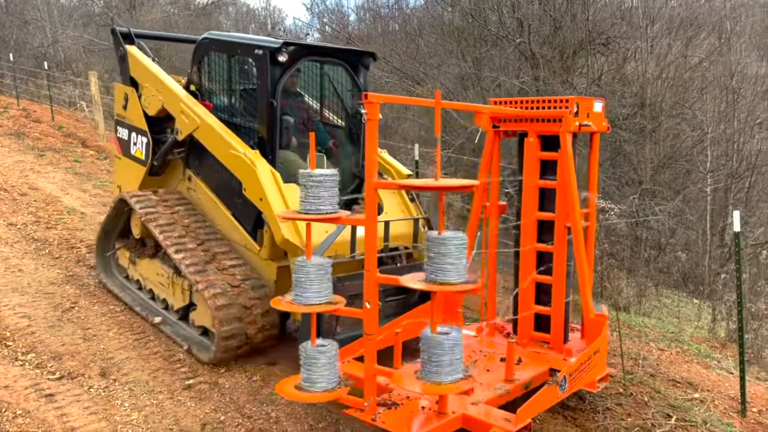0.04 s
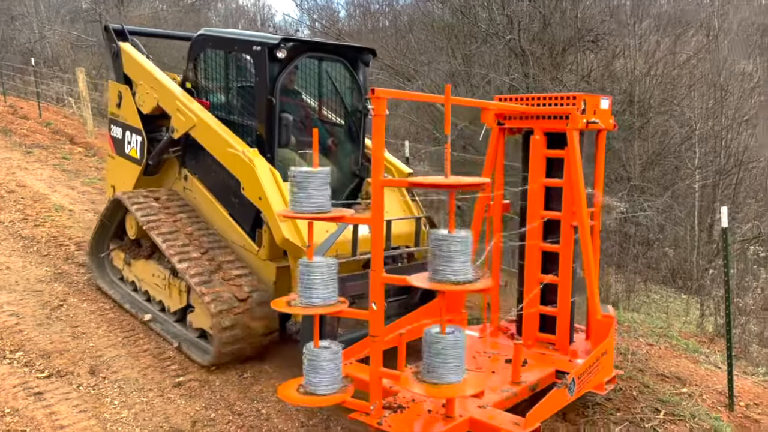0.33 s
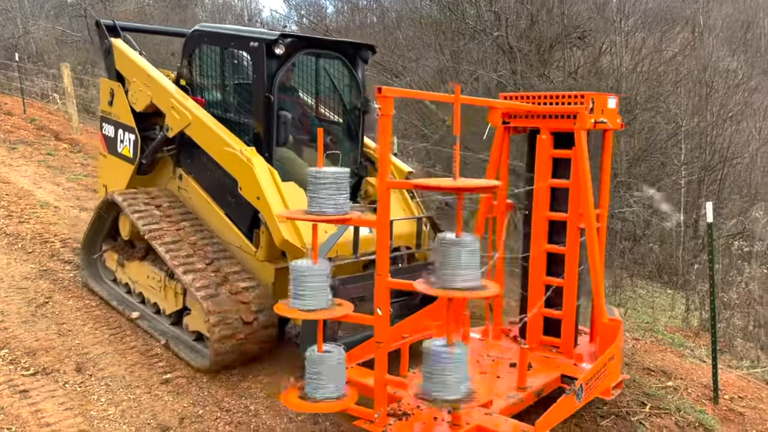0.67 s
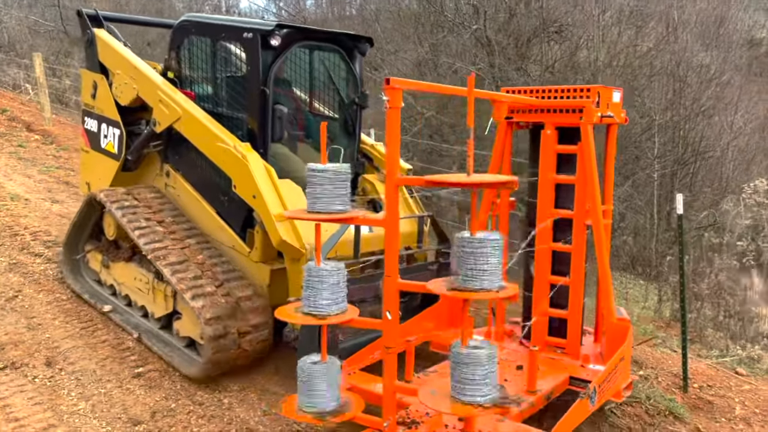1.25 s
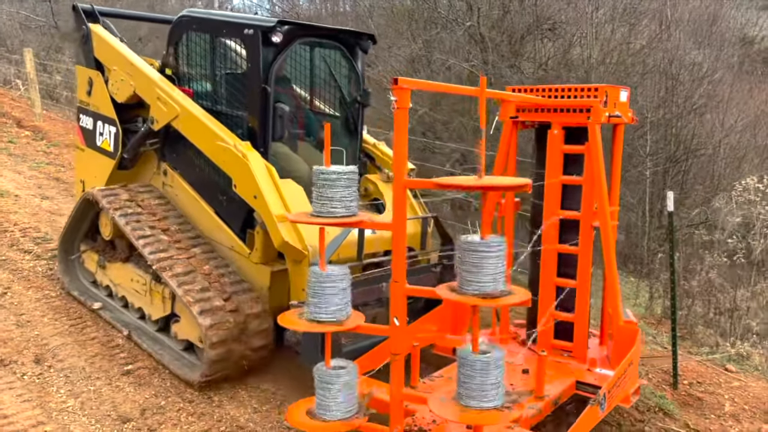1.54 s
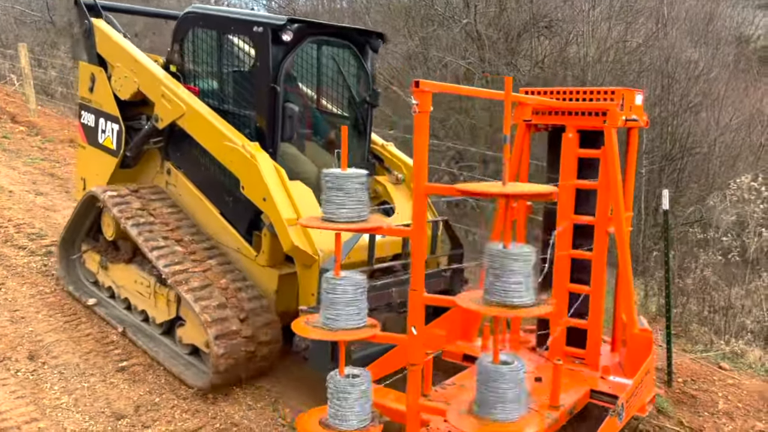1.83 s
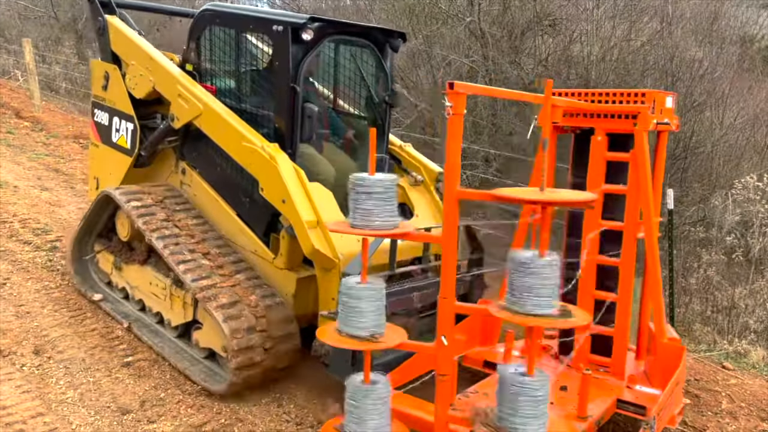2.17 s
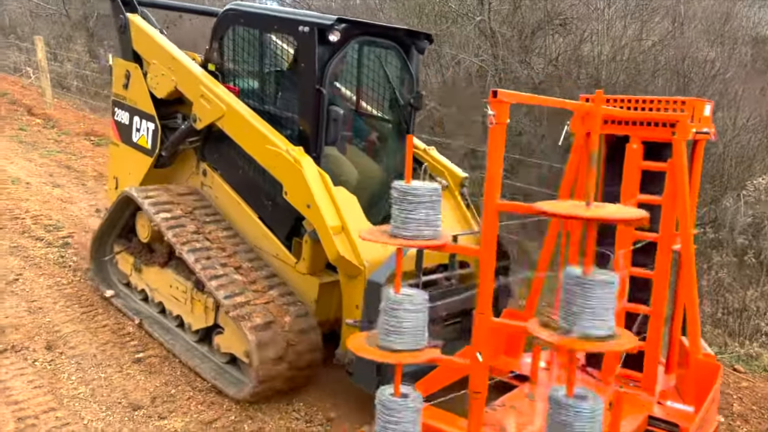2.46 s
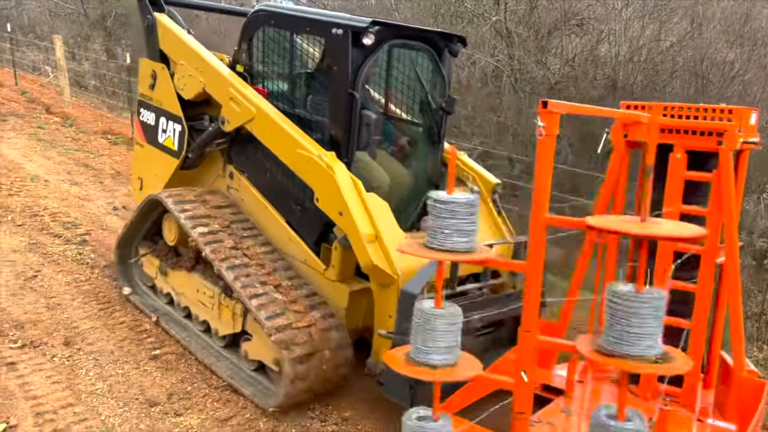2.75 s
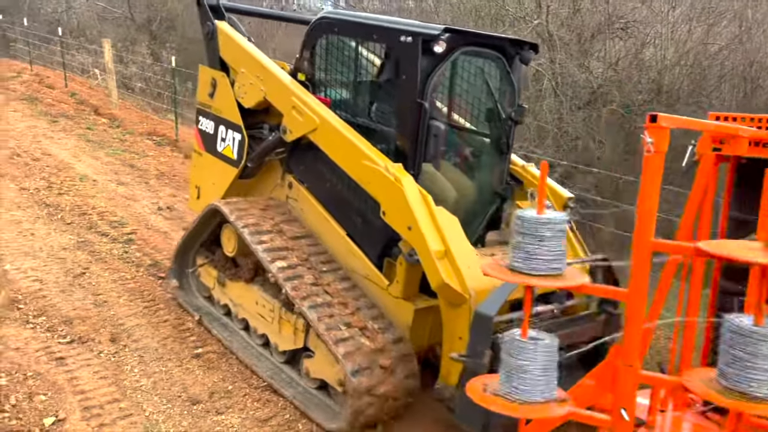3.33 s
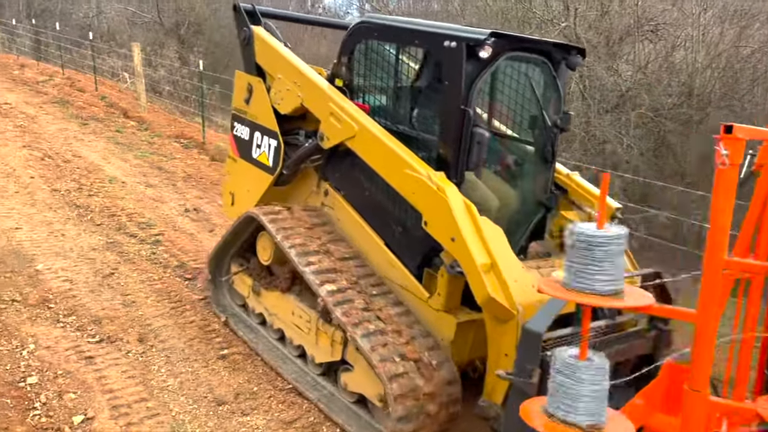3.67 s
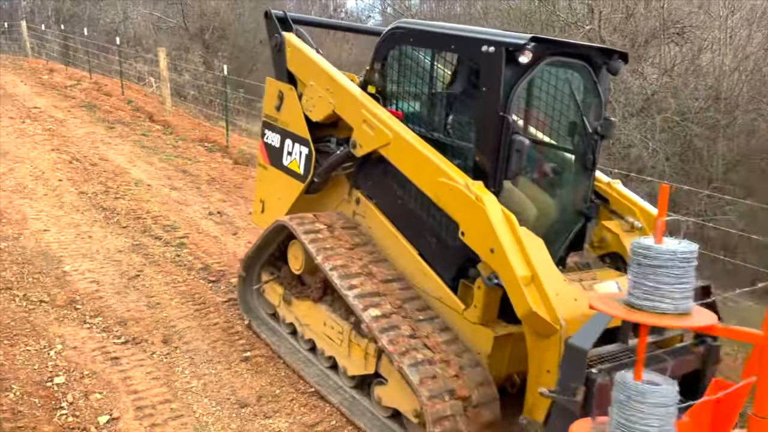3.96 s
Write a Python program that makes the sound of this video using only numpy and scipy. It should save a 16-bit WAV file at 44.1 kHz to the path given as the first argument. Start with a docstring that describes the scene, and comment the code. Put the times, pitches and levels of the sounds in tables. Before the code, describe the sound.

A tracked loader crawls along outdoors, its diesel droning and hydraulics whining over rumbling, gritty tracks. Its steel rack and wire spools clank and jingle throughout. Wind buffets the close microphone early; brief scrapes and squeals come later.

```python
"""A dirt slope: a compact tracked loader crawls along, carrying a steel rack of fence-wire spools.
The diesel drones and the hydraulic drive whines over tracks that rumble and crush grit. Spools chink
on their spindles, wire jingles and pings, and the rack clanks, scrapes and squeals in its mount.
A gust buffets the microphone in the first second or so; soft low thumps come during and after it."""
import sys
import numpy as np
from scipy import signal
from scipy.fft import rfft, irfft
from scipy.io import wavfile
from scipy.ndimage import uniform_filter1d

SR = 44100
rng = np.random.default_rng(int(sys.argv[2]) if len(sys.argv) > 2 else 0)


def master_out(mix):
    """Clip the mix to full scale and print it as 16-bit PCM to the path in sys.argv[1]."""
    frames = np.transpose(np.atleast_2d(mix))
    ceiling = np.clip(frames, -1, 1)
    pcm = np.round(ceiling * 32767).astype(np.int16)
    wavfile.write(sys.argv[1], SR, pcm)


N = 176400

# Engine speed. Each row: time in seconds, firings per second.
FIRING_HZ = [(0, 76.8), (.5, 75.8), (1, 75.5), (2, 76), (2.8, 76.8), (3.3, 76.4), (4, 75.6)]
# Exhaust partials. Each row: multiple of the crank rate, relative level in dB.
EXHAUST_ORDERS = [(1, -13.5), (2, -0.5), (3, -12.5), (4, -21), (5, -27), (6, -20.5), (8, -23)]
# Exhaust drone and high engine whine. Each row: time in seconds, gain in dB.
EXHAUST_DB = [(0, -24.5), (.3, -28), (.7, -23.5), (1.05, -37.5), (1.6, -40), (2.2, -41), (2.6, -36),
              (3, -25.5), (3.3, -26), (3.5, -32.5), (3.75, -26.5), (4, -22)]
HIGH_WHINE_DB = [(0, -59), (1.8, -46), (3.3, -47.5), (3.7, -41), (4, -41)]
# Pump and drive motor whines. Each row: harmonic number, level in dB.
PUMP_PARTIALS = [(2, -47.5), (3, -40.5), (4, -40.5), (5, -55), (6, -51.5)]
MOTOR_PARTIALS = [(1, -42), (2, -45.5), (3, -43), (4, -39.5), (5, -50.5)]
# Their envelopes. Each row: time in seconds, gain in dB.
PUMP_GAIN_DB = [(0, -0.5), (1, 1), (1.7, 3), (2.3, -3), (3, -9.5), (4, -2)]
MOTOR_GAIN_DB = [(0, -6), (.6, -5), (1.5, -5.5), (2.3, -6), (3, -0.5), (4, 4.5)]

# Track rumble, grit, loose wire and gust. Each row: frequency in Hz, relative density in dB.
RUMBLE_SPECTRUM = [(20, -28), (35, -7), (55, 8.5), (90, 6.5), (150, -1), (260, -1.5), (340, 2), (410, -3.5),
                   (490, -1.5), (670, 0.5), (800, -4), (930, -8.5), (1060, -12.5), (1300, -10.5),
                   (1800, -17.5), (3000, -57.5), (8000, -75)]
GRIT_SPECTRUM = [(300, -36), (1000, 11), (2000, 5), (3200, 6.5), (3900, 5), (4600, 2.5), (6000, 0.5),
                 (7200, -5), (9000, -8), (12500, -5), (16000, -26)]
JINGLE_SPECTRUM = [(500, -30), (1500, 3.5), (2400, 6.5), (3200, 0), (4000, -3), (5500, 7), (7000, -1.5),
                   (9000, 1), (12500, -2.5), (16000, -42)]
GUST_SPECTRUM = [(20, -35), (36, -12), (52, -2), (100, -1.5), (150, -5), (260, -8.5), (400, -21),
                 (800, -27), (3000, -55)]
# Their envelopes. Each row: time in seconds, level in dB.
RUMBLE_DB = [(0, -29), (.8, -30), (1.3, -30), (1.7, -29), (2.1, -30.5), (2.4, -28), (2.8, -29.5),
             (3.4, -28.5), (4, -27.5)]
GRIT_DB = [(0, -43), (.8, -34.5), (1.3, -43), (1.7, -42), (2.05, -38), (2.4, -34.5), (2.8, -37),
           (3.15, -38.5), (3.5, -38.5), (4, -32)]
JINGLE_DB = [(0, -41), (.2, -30), (.35, -44), (.55, -33), (.7, -37.5), (.78, -34), (1.05, -44), (1.6, -41),
             (1.9, -40), (2.1, -35), (2.4, -42), (2.8, -42.5), (3.05, -37.5), (3.45, -42.5), (3.9, -38)]
GUST_DB = [(0, -61), (.33, -31), (.45, -24.5), (.57, -28), (.66, -22), (.8, -19.5), (.87, -25),
           (.94, -20.5), (1.08, -28.5), (1.4, -49), (2.1, -60), (4, -62)]

# Steel modes. Each row: frequency in Hz, relative level in dB, T60 in seconds.
SPOOL_MODES = [(1024, 1, 0.24), (1754, 5.5, 0.25), (1880, -7, 0.29), (2335, 0, 0.48), (3115, 7, 0.29),
               (3134, 6.5, 0.69), (3354, 4.5, 0.35), (4550, 5, 0.13), (5340, 7, 0.24), (5440, 9, 0.12),
               (6080, 6, 0.059), (6600, 6, 0.078)]
RACK_MODES = [(873, -3, 0.36), (993, -6, 0.38), (1260, -4.5, 0.31), (1540, -4, 0.29), (2032, -0.5, 0.076),
              (2362, 5.5, 0.17), (2810, -2.5, 0.29), (3320, -9, 0.2), (3760, 1, 0.16), (4360, 5, 0.13),
              (5330, 6.5, 0.086)]
# Dense steel ringing and scrape rasp. Each row: frequency in Hz, relative density in dB.
SPOOL_WASH_SPECTRUM = [(300, -32), (900, 0), (2000, -5), (3200, -5.5), (4000, -3.5), (5400, 6), (7000, 3.5),
                       (9000, -1.5), (12500, -6), (16000, -28)]
RACK_WASH_SPECTRUM = [(200, 0), (800, -19.5), (2700, 16), (4200, 4.5), (6000, -2), (7500, -8),
                      (12500, -10.5), (16000, -43)]
RASP_SPECTRUM = [(150, -22), (480, 7.5), (850, -1), (1280, 3.5), (1750, -7.5), (2400, 2), (4000, -17),
                 (7000, -10), (16000, -81)]
# Blows on steel. Each row: start in seconds, low, mid and high band levels in dB, T60 factor.
SPOOL_BLOWS = [(.059, -34, -39, -41, 0.61), (.111, -31.5, -31.5, -28.5, 1.1), (.245, -45, -35.5, -30, 0.93),
               (.497, -29, -29.5, -27.5, 0.57), (.551, -34, -28.5, -18, 0.73), (.952, -39, -48, -33, 0.58),
               (1.118, -39, -32, -29, 0.79), (1.308, -32, -31.5, -27.5, 0.8),
               (1.539, -35.5, -38, -37, 0.63), (1.72, -49, -32, -31.5, 0.52), (1.865, -36, -32, -30.5, 0.9),
               (2.053, -38, -35.5, -35.5, 0.92), (2.08, -46, -50, -30.5, 1.3), (2.177, -43, -25, -20, 0.93),
               (2.256, -56, -39, -31.5, 1.1), (2.442, -29.5, -24, -22, 1.03),
               (2.603, -47, -30.5, -23, 0.88), (2.863, -41, -28, -29.5, 1.2), (3.23, -56, -30, -31, 0.75),
               (3.329, -58, -32.5, -24.5, 0.84), (3.563, -54, -25, -29, 0.56),
               (3.685, -39, -26, -26.5, 0.97), (3.858, -32.5, -28.5, -25.5, 0.21)]
RACK_BLOWS = [(.168, -28, -26.5, -45, 1.1), (.203, -30.5, -22, -37, 0.72), (.383, -30, -24.5, -29.5, 1.34),
              (.722, -23.5, -19, -27.5, 0.69), (.834, -37, -30, -35, 0.6), (.966, -24.5, -22, -27, 0.75),
              (1.193, -31.5, -29, -35, 0.82), (1.632, -48, -56, -57, 0.4), (1.958, -55, -31, -44, 1.2),
              (2.385, -43, -28, -32.5, 1.1), (3.594, -49, -32.5, -28.5, 1.7),
              (3.809, -52, -33.5, -41, 0.79), (3.899, -45, -28, -30, 0.51), (3.912, -28.5, -27, -58, 1.8)]
# Edges in Hz of the low-to-mid and mid-to-high band crossfades.
CROSSOVER_HZ = [1100, 1700, 3900, 4600]
# Plucked wire. Each row: start in seconds, frequency in Hz, level in dB, T60 in seconds.
WIRE_PINGS = [(.11, 1866, -22, 0.46), (.205, 1712, -21.5, .15), (.834, 4030, -18.5, 0.066),
              (.835, 4630, -10, 0.033), (2.18, 1800, -27.5, 0.43), (2.71, 3320, -25.5, 0.26),
              (3.018, 3930, -25.5, 0.27), (3.329, 3970, -21, 0.09), (3.684, 3140, -30, 0.15),
              (3.858, 2395, -14.5, 0.064)]
# Low thumps. Each row: centre in seconds, frequency in Hz, level in dB, time constant in seconds.
LOW_THUMPS = [(.452, 142, -12.5, 0.011), (0.608, 103, -10, .009), (.685, 117, -12, 0.012),
              (0.754, 62, -17, 0.012), (0.778, 425, -10.5, 0.0027), (0.804, 86, -1.5, 0.0057),
              (.828, 156, -11.5, 0.0062), (0.872, 238, -13.5, 0.0018), (0.934, 222, -17, 0.0049),
              (1.024, 229, -20, 0.012), (1.275, 170, -18.5, 0.0054), (1.52, 133, -18.5, 0.0048),
              (1.9, 165, -22.5, 0.0069), (3.25, 103, -13, 0.0099)]
# Rack scrapes. Each row: centre in seconds, half-width in seconds, level in dB.
RACK_SCRAPES = [(0.875, 0.064, -30), (2.299, 0.011, -24.5), (2.334, 0.027, -24.5), (2.39, 0.028, -27.5),
                (2.634, 0.029, -28), (3.02, 0.044, -26.5)]
# Steel squeals. Each row: centre in seconds, half-width in seconds, pitch in Hz, level in dB.
STEEL_SQUEALS = [(0.841, 0.018, 1024, -22), (0.868, 0.0099, 1050, -24), (2.336, 0.0066, 1260, -22.5),
                 (2.592, .016, 1044, -25), (2.622, 0.023, 1022, -22), (2.998, 0.023, 1044, -24.5),
                 (3.95, 0.029, 1057, -36)]
# Squeal timbre. Each row: harmonic number, relative level in dB.
SQUEAL_HARMONICS = [(1, 0), (2, -12), (3, -17)]

# Scatter off ground and trees; long waves pass them by. Each row: frequency in Hz, relative gain in dB.
SCATTER_DB = [(60, -25), (200, -10), (500, -1), (2000, 2), (12000, 2)]
# Share of track and gust noise that differs between ports. Each row: frequency in Hz, gain in dB.
SIDE_DB = [(30, -19), (70, -14), (140, -14), (300, -18), (1000, -11.5), (2000, -5.5), (5000, -7.5),
           (12000, -29)]
# Phase between microphone ports. Each row: frequency in Hz, left lead in radians.
PORT_PHASE_RAD = [(20, 0), (200, .1), (520, .5), (1550, -.2), (2840, 1.1), (4220, .1), (6550, -.2),
                  (7200, -1.2), (7700, -3.1), (8900, -3.15), (9400, -4.6), (10400, -5.6), (12600, -6.8),
                  (13400, -9.3), (15700, -9.4)]
# Port balance. Each row: frequency in Hz, left minus right in dB.
PORT_BALANCE_DB = [(110, .2), (200, .3), (380, 2.2), (650, 3), (1200, .8), (2380, 1.2), (4400, 2.2),
                   (8120, 0)]
# Microphone response. Each row: frequency in Hz, gain in dB.
MIC_DB = [(20, -1.5), (12600, -2), (13600, -1), (16000, -1)]


def undb(db):
    """Decibels to gain."""
    return 10 ** (np.asarray(db) / 20)


def unit(x):
    """Scale to rms 1."""
    return x / np.sqrt(np.mean(x ** 2) + 1e-18)


def curve(rows):
    """Join (s, value) points by straight lines."""
    return np.interp(np.arange(N) / SR, *np.array(rows).T)


def over_hz(rows, size):
    """Join (Hz, value) points on a log-frequency axis."""
    hz, value = np.array(rows).T
    return np.interp(np.log(np.fft.rfftfreq(size, 1 / SR) + 1), np.log(np.abs(hz) + 1), value)


def colour(x, spectrum):
    """Filter by a spectrum, to rms 1."""
    return unit(irfft(rfft(x) * undb(over_hz(spectrum, len(x))), len(x)))


def walk(rate_hz):
    """Smooth random drift, rms 1."""
    hold = max(int(SR / rate_hz), 1)
    steps = np.repeat(rng.standard_normal(N // hold + 1), hold)
    return unit(uniform_filter1d(uniform_filter1d(steps, hold), hold)[:N])


def clicks(per_s, spread_db):
    """Random contacts, mostly small, a few large."""
    hits = (rng.random(N) < per_s / SR) * rng.choice([-1, 1], N)
    return hits * undb(spread_db * np.minimum(rng.exponential(size=N), 5))


def add(out, x, start_s):
    """Mix a sound in at a time."""
    i = max(int(start_s * SR), 0)
    out[i:i + len(x)] += x[:max(N - i, 0)]


def decay(t, t60_s):
    """Fall of 60 dB per T60."""
    return np.exp(-np.log(1000) * t / t60_s)


def swell(centre_s, half_width_s):
    """Gaussian rise and fall."""
    return np.exp(-((np.arange(N) / SR - centre_s) / half_width_s) ** 2)


def tones(hz, partials, flutter_db=0):
    """Harmonics of a moving pitch, with optional level flutter."""
    phase = 2 * np.pi * np.cumsum(hz) / SR
    return np.sqrt(2) * sum(
        undb(db + flutter_db * walk(14)) * np.sin(k * phase + 2 * np.pi * rng.random())
        for k, db in partials)


def ring(modes, t, stretch, spread_db, wander_hz=100):
    """Decaying modes, randomly weighted and roughened by the loose contact."""
    hz, db, t60_s = np.array(modes).T[:, :, None]
    weight, detune, offset = rng.standard_normal((3, len(modes), 1))
    wander = np.repeat(rng.standard_normal((len(modes), len(t) // 64 + 1)), 64, axis=1)[:, :len(t)]
    turns = hz * (1 + 0.0025 * detune) * t + offset + np.cumsum(wander_hz * wander, axis=1) / SR
    return np.sum(undb(db + spread_db * weight) * decay(t, t60_s * stretch) * np.sin(2 * np.pi * turns), 0)


def shimmer(t, count, spread_db):
    """A crowd of unequal steel partials, different for each point of contact."""
    place, offset = rng.random((2, count, 1))
    gains = undb(spread_db * rng.standard_normal(count))
    hz = 400 + 15000 * place ** 1.4
    return gains @ np.sin(2 * np.pi * (hz * t + offset))


def engine():
    """Four cylinders give two firings a turn; fan and gears sing at higher crank orders."""
    crank_hz = curve(FIRING_HZ) / 2 * (1 + 0.0059 * walk(15))
    exhaust = undb(curve(EXHAUST_DB)) * tones(crank_hz, EXHAUST_ORDERS, flutter_db=1.6)
    fan = tones(crank_hz, [(12, -46)], flutter_db=4.5)
    whine = undb(curve(HIGH_WHINE_DB)) * tones(crank_hz, [(28, 0)], flutter_db=7.5)
    return exhaust + fan + whine


def hydraulics(pump_hz=172.6, motor_hz=122.97):
    """The pump whines, roughened by pressure ripple; the drive motor wavers."""
    ripple = unit(undb(2.2 * walk(70)))
    pump = ripple * tones(pump_hz * (1 + 0.003 * walk(20)), PUMP_PARTIALS)
    motor = tones(motor_hz * (1 + 0.00722 * walk(10)), MOTOR_PARTIALS, flutter_db=2.5)
    return pump * undb(curve(PUMP_GAIN_DB)) + motor * undb(curve(MOTOR_GAIN_DB))


def tracks():
    """Rubber tracks rumble and crush grit."""
    rumble = colour(rng.standard_normal(N), RUMBLE_SPECTRUM) * undb(curve(RUMBLE_DB) + 1.55 * walk(24.72))
    grains = unit(clicks(per_s=1500, spread_db=-0.5))
    hiss = 0.93 * rng.standard_normal(N)
    grit = colour(grains + hiss, GRIT_SPECTRUM) * undb(curve(GRIT_DB) + 0.99 * walk(27.05))
    return rumble + grit


def rattle(cutoff_hz=3800):
    """Small soft knocks keep the lower spool and rack modes ringing faintly."""
    out, t = np.zeros(N), np.arange(SR // 2) / SR
    for modes, db in ((SPOOL_MODES, -43.5), (RACK_MODES, -46.5)):
        knocks = clicks(per_s=95, spread_db=2.5)
        ringing = signal.fftconvolve(knocks, ring(modes, t, stretch=1.1, spread_db=0))[:N]
        out += undb(db) * unit(ringing)
    return signal.sosfilt(signal.butter(2, cutoff_hz, fs=SR, output="sos"), out)


def jingle(touches_per_s=140, attack_s=0.00084):
    """Loose wire and spool flanges touch lightly and ring, among dry ticks."""
    touches, t = np.zeros(N), np.arange(SR // 12) / SR
    envelope = decay(t, t60_s=0.13) * (1 - np.exp(-t / attack_s)) * (1 - t / t[-1])
    for start_s in rng.random(int(touches_per_s * N / SR)) * N / SR:
        add(touches, shimmer(t, count=24, spread_db=5.5) * envelope, start_s)
    ticks = undb(-3) * unit(clicks(per_s=150, spread_db=2.2))
    return colour(unit(touches) + ticks, JINGLE_SPECTRUM) * undb(curve(JINGLE_DB) + 2.5 * walk(21.85))


def blows(rows, modes, spectrum, wash_db, wash_t60_s, attack_s, chatter_db, spread_db, crack_s=0.0063):
    """Steel chatters on steel: a crack, then clear modes over a dense wash, levelled in three bands."""
    out, size = np.zeros(N), 12288
    t = np.arange(size) / SR
    head = slice(int(0.03 * SR))  # levels refer to the first 30 ms
    envelope = (1 - np.exp(-t / attack_s)) * (1 - (t / t[-1]) ** 2)
    masks = [over_hz(list(zip(CROSSOVER_HZ, gains)), size)
             for gains in ([1, 0, 0, 0], [0, 1, 1, 0], [0, 0, 0, 1])]
    for start_s, *bands_db, stretch in rows:
        clear = ring(modes, t, stretch, spread_db)
        chatter = undb(chatter_db * np.interp(t, np.linspace(0, t[-1], 110), rng.standard_normal(110)))
        crack = colour(rng.standard_normal(size), spectrum) * np.exp(-t / crack_s)
        dense = colour(shimmer(t, count=220, spread_db=6.5), spectrum) * decay(t, wash_t60_s * stretch)
        wash = (dense + crack) * chatter
        mix = rfft(clear / clear[head].std() + undb(wash_db) * wash / wash[head].std())
        bands = [irfft(mix * mask, size) for mask in masks]
        blow = sum(undb(db) * band / band[head].std() for db, band in zip(bands_db, bands))
        add(out, blow * envelope, start_s)
    return out


def spool_chinks():
    """Spools knock on their spindles and ring."""
    return blows(SPOOL_BLOWS, SPOOL_MODES, SPOOL_WASH_SPECTRUM, wash_db=2.5, wash_t60_s=0.17,
                 attack_s=0.0022, chatter_db=1, spread_db=6.5)


def wire_pings(wander_hz=60, attack_s=0.0031):
    """Wire, plucked as it pays out, rings in two planes and buzzes against the guides."""
    out, t = np.zeros(N), np.arange(SR // 2) / SR
    for start_s, hz, db, t60_s in WIRE_PINGS:
        turns = np.cumsum(hz + wander_hz * walk(300)[:len(t)]) / SR
        planes = np.sin(2 * np.pi * turns) + 0.34 * np.sin(2 * np.pi * (0.88 * turns + rng.random()))
        add(out, undb(db) * planes * decay(t, t60_s) * (1 - np.exp(-t / attack_s)), start_s)
    return out


def rack_clanks():
    """Steel blows ring the rack frame."""
    return blows(RACK_BLOWS, RACK_MODES, RACK_WASH_SPECTRUM, wash_db=3, wash_t60_s=0.23,
                 attack_s=0.0024, chatter_db=2.5, spread_db=7.5)


def gust():
    """Wind flutters on the microphone."""
    return colour(rng.standard_normal(N), GUST_SPECTRUM) * undb(curve(GUST_DB) + 1.5 * walk(40.63))


def thumps():
    """Soft low thumps, a cycle or two each."""
    t = np.arange(N) / SR
    return -sum(undb(db) * np.exp(-np.abs(t - centre_s) / tau_s) * np.sin(2 * np.pi * hz * (t - centre_s))
                for centre_s, hz, db, tau_s in LOW_THUMPS)


def rack_scrapes(judder_db=3, judder_hz=170):
    """The rack grinds in its mount: gritty slips in juddering bunches."""
    slips = colour(clicks(per_s=1800, spread_db=2.7), RASP_SPECTRUM)
    rasp = unit(slips * undb(judder_db * walk(judder_hz)))
    return rasp * sum(undb(db) * swell(centre_s, half_s) for centre_s, half_s, db in RACK_SCRAPES)


def squeals(slip_hz=330, rough_db=2.5):
    """Dry steel sticks and slips: a rough note of unsteady pitch."""
    waver = 1 + 0.035 * walk(slip_hz)
    grip = unit(undb(rough_db * walk(slip_hz)))
    return grip * sum(undb(db) * swell(centre_s, half_s) * tones(hz * waver, SQUEAL_HARMONICS)
                      for centre_s, half_s, hz, db in STEEL_SQUEALS)


def scene(scatter_tau_s=0.02):
    """The machine reaches two close microphone ports, with a little scatter off ground and trees."""
    knocks = spool_chinks() + rack_clanks()
    direct = engine() + hydraulics() + tracks() + gust() + thumps()
    direct += knocks + rattle() + rack_scrapes() + squeals() + wire_pings()
    t = np.arange(SR // 4) / SR
    tails = rng.standard_normal((2, len(t))) * np.exp(-t / scatter_tau_s)
    side = rfft(tracks() + undb(4) * gust()) * undb(over_hz(SIDE_DB, N))  # independent noise
    direct += jingle()
    scatter = np.array([signal.fftconvolve(direct, tail / np.linalg.norm(tail))[:N] for tail in tails])
    arriving = rfft(direct) + undb(over_hz(SCATTER_DB, N) - 12) * rfft(scatter)
    sign = np.array([[1], [-1]])  # left, right
    balance = undb(sign * over_hz(PORT_BALANCE_DB, N) / 2)
    phase_shift = np.exp(1j * sign * over_hz(PORT_PHASE_RAD, N) / 2)
    return irfft(arriving * balance * phase_shift + sign * side, N)


def record(dry, cutoff_hz=16000):
    """A nearly flat microphone, then a steep low-pass."""
    picked_up = irfft(rfft(dry) * undb(over_hz(MIC_DB, N)), N)
    return signal.sosfilt(signal.ellip(8, 0.2, 70, cutoff_hz, fs=SR, output="sos"), picked_up)


dry = scene()
out = record(dry)
master_out(out)
```